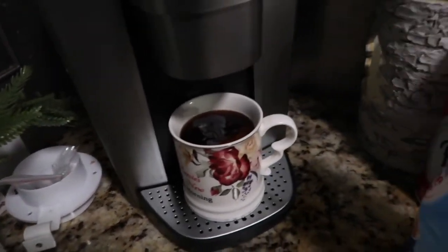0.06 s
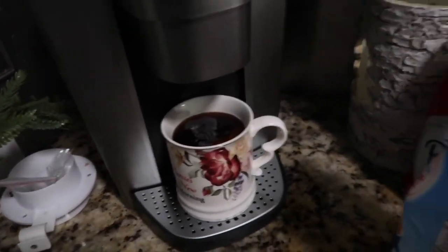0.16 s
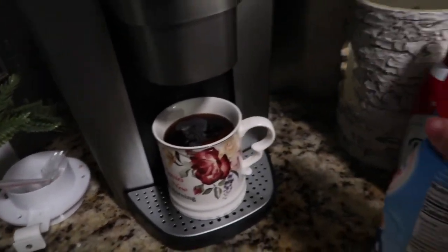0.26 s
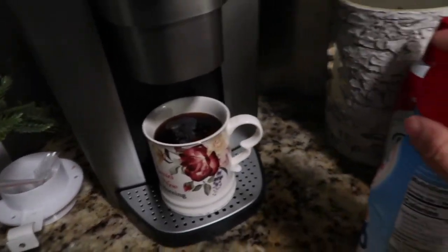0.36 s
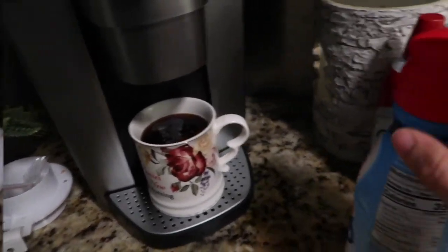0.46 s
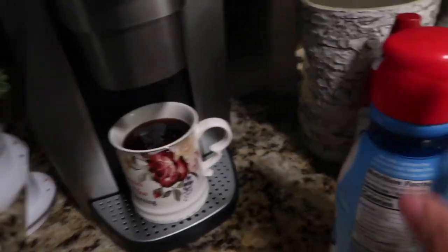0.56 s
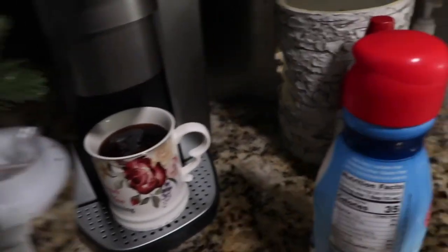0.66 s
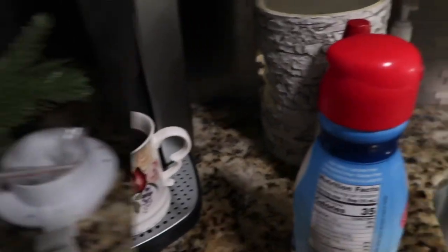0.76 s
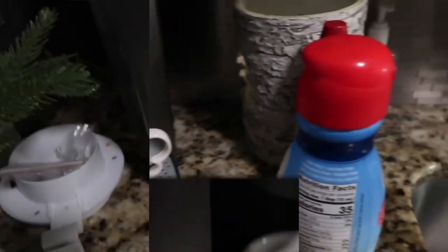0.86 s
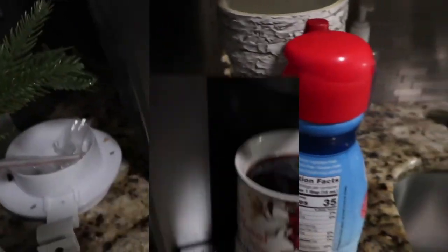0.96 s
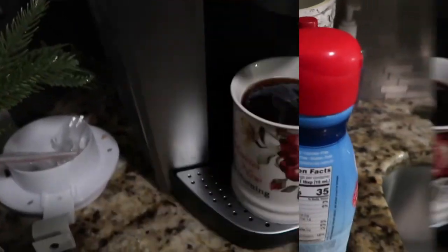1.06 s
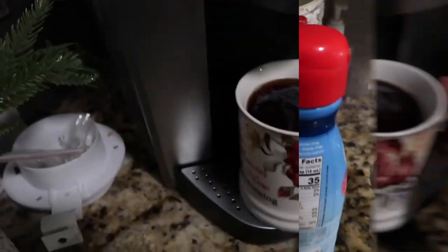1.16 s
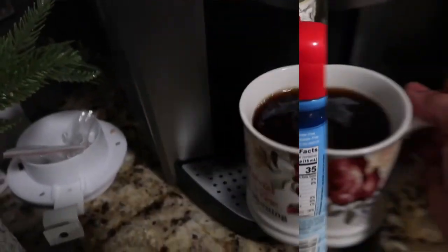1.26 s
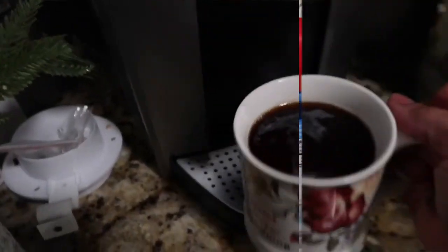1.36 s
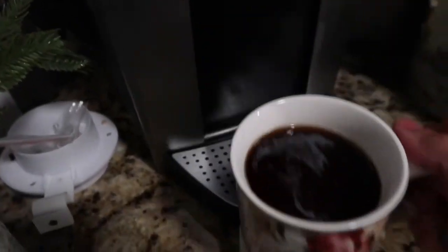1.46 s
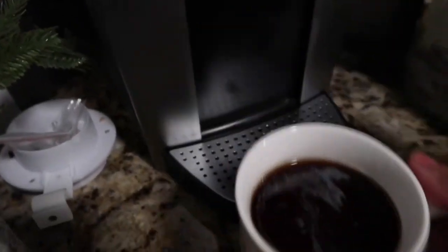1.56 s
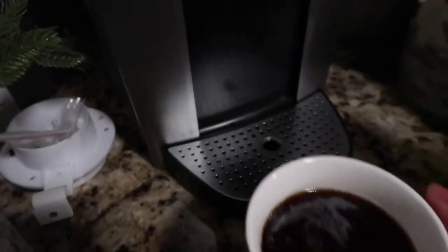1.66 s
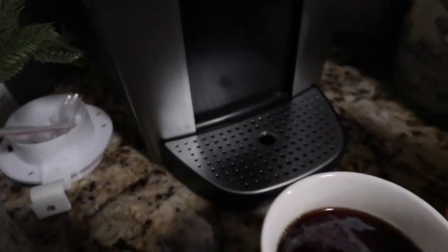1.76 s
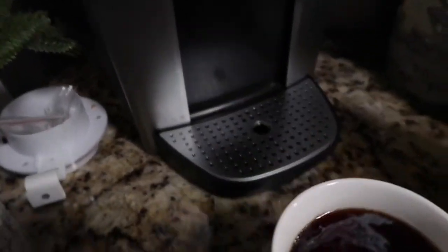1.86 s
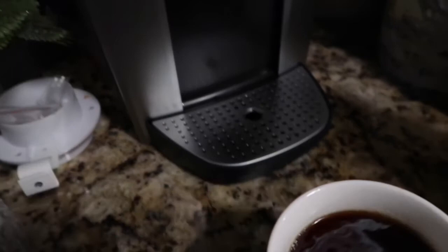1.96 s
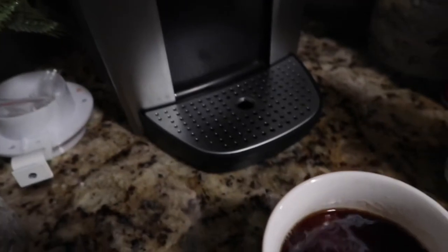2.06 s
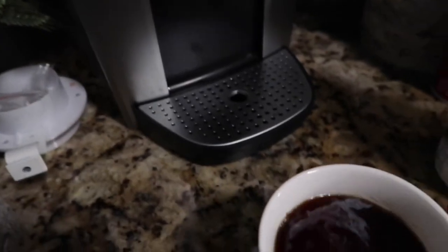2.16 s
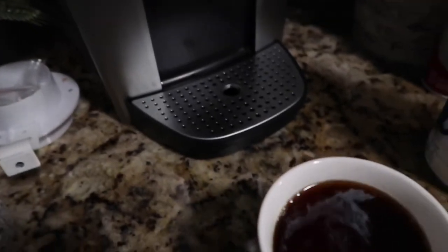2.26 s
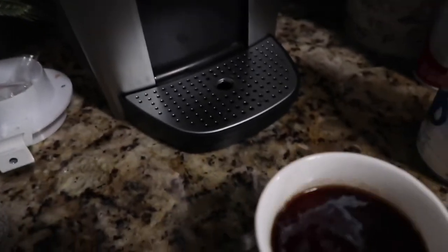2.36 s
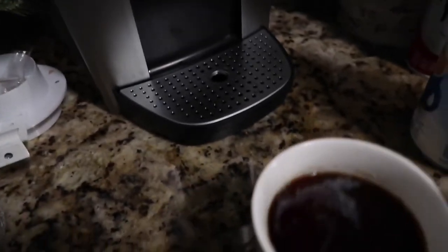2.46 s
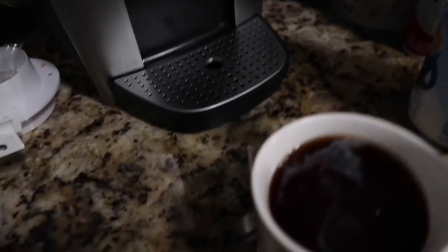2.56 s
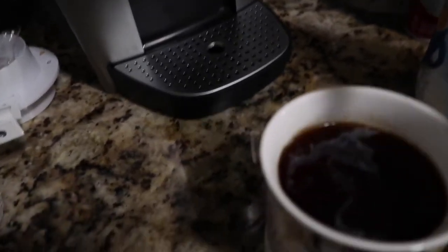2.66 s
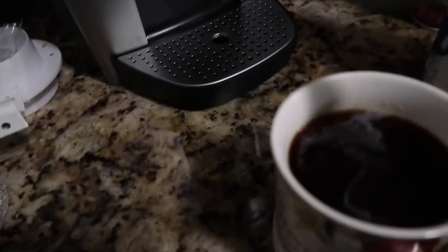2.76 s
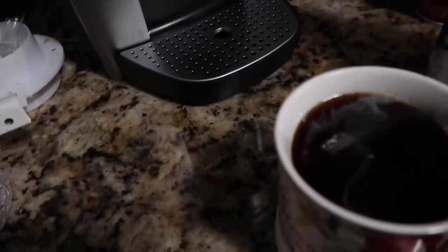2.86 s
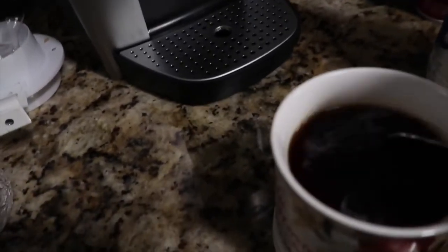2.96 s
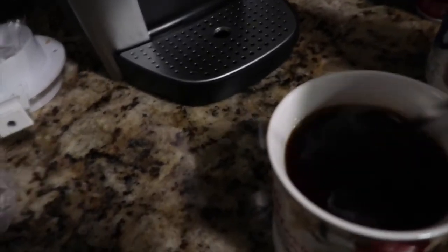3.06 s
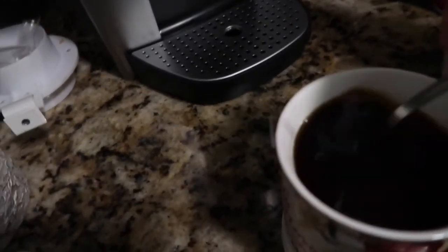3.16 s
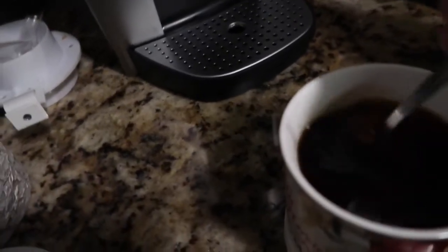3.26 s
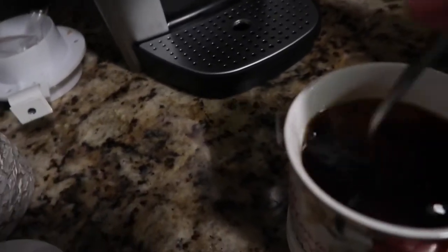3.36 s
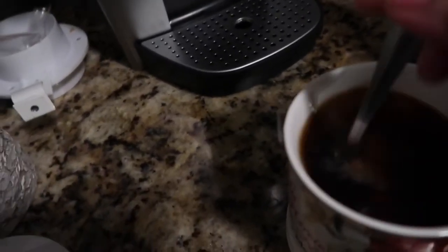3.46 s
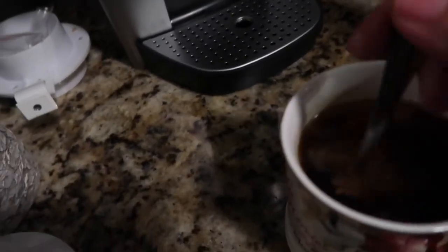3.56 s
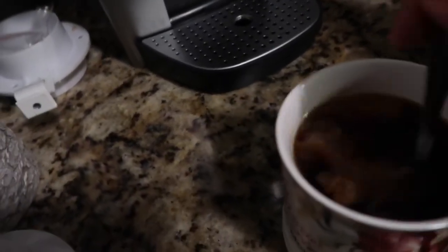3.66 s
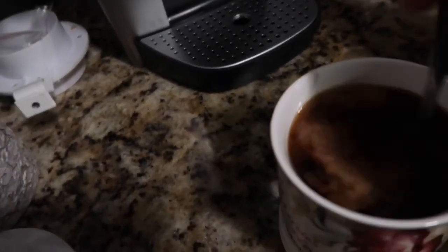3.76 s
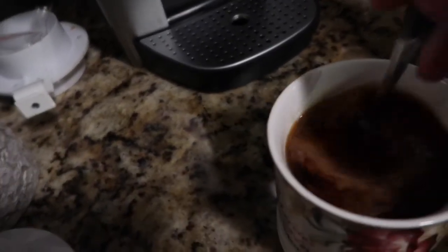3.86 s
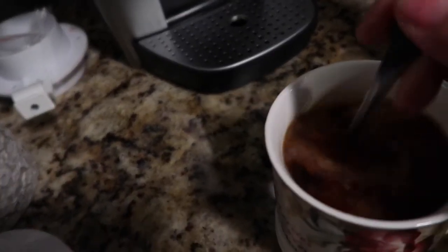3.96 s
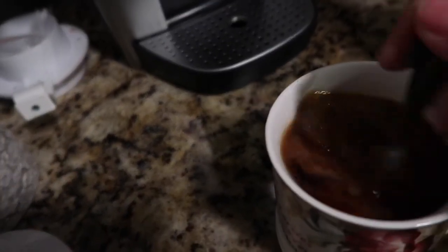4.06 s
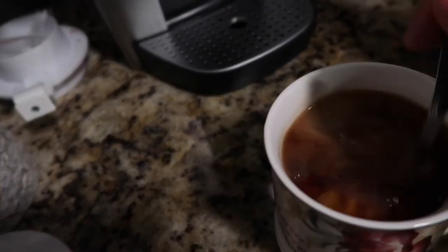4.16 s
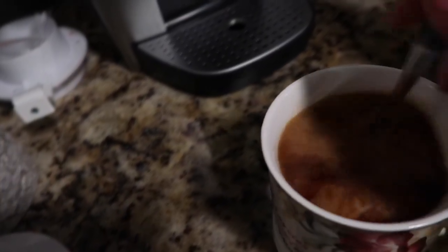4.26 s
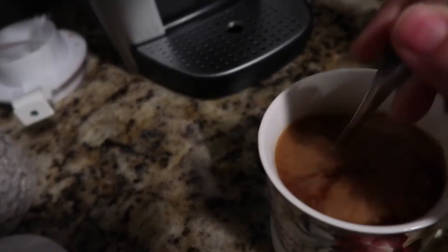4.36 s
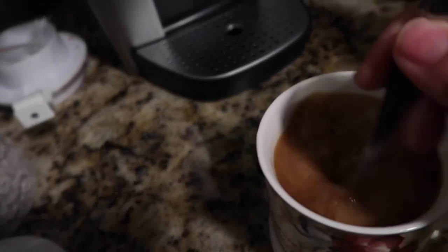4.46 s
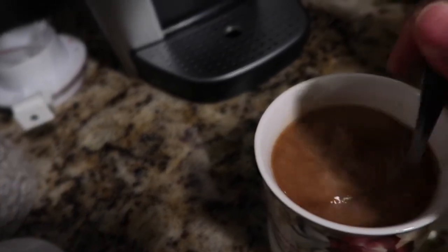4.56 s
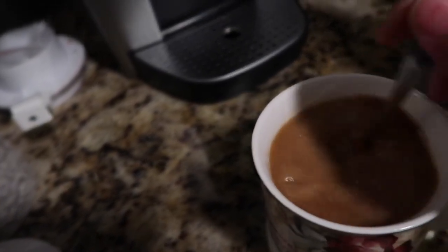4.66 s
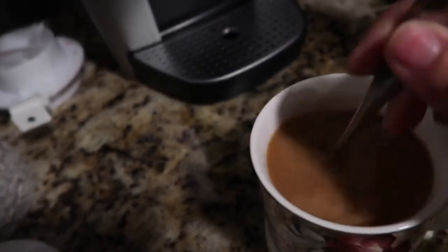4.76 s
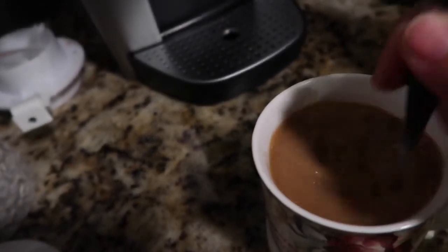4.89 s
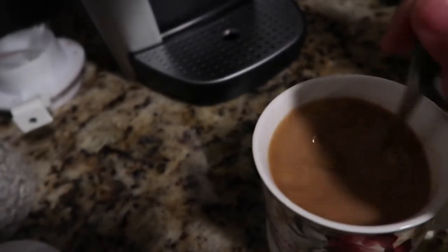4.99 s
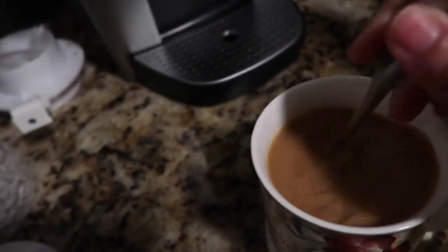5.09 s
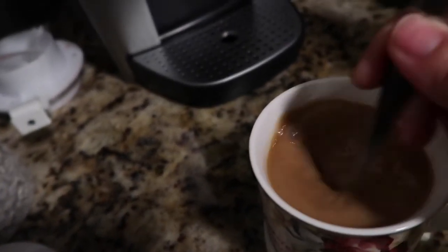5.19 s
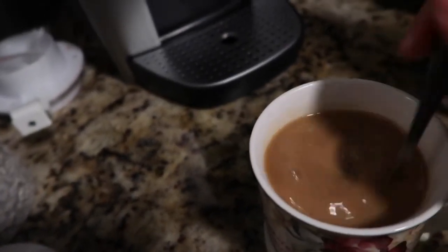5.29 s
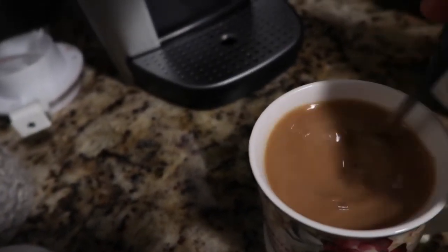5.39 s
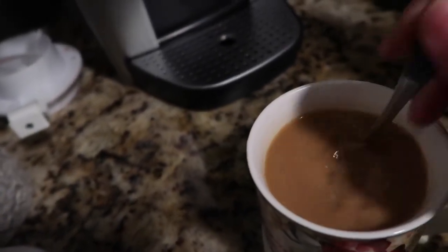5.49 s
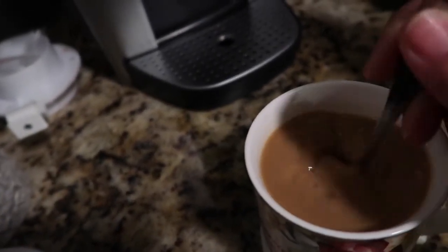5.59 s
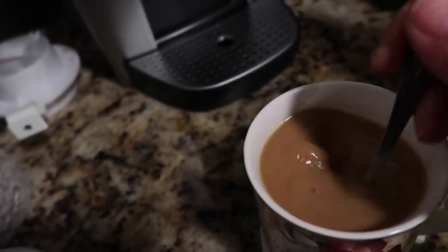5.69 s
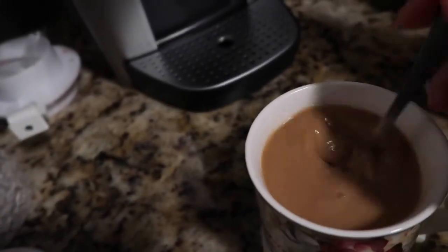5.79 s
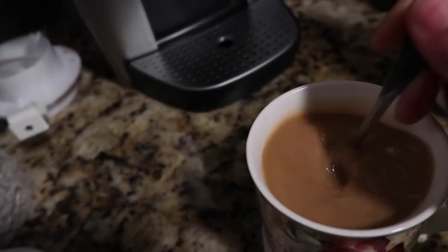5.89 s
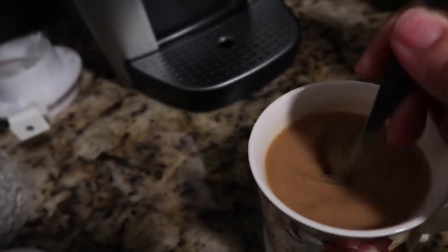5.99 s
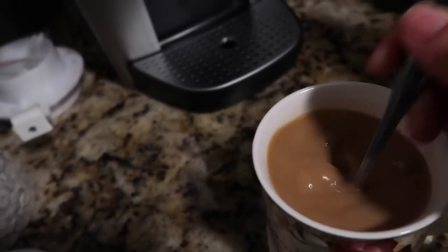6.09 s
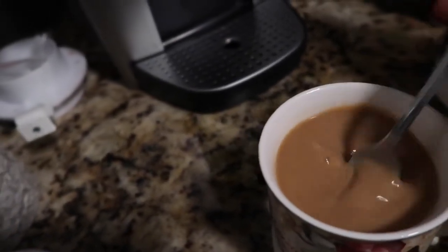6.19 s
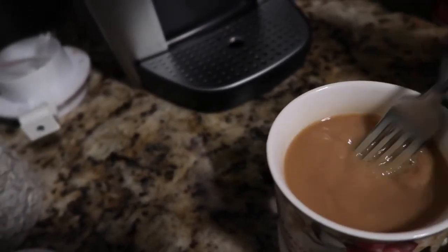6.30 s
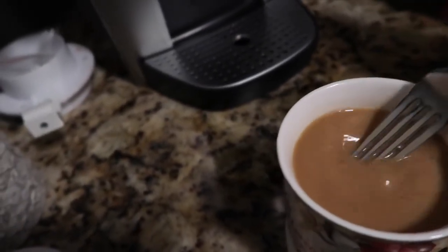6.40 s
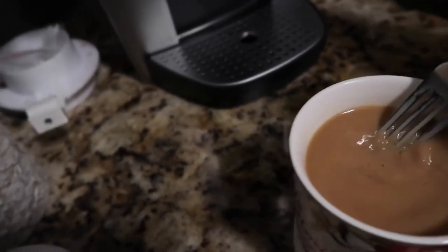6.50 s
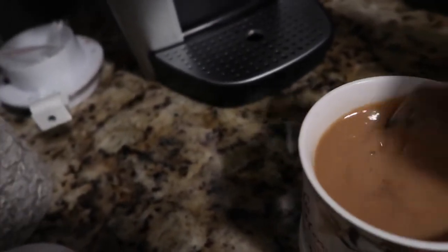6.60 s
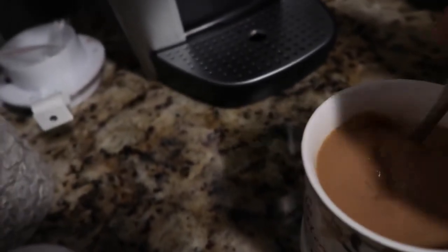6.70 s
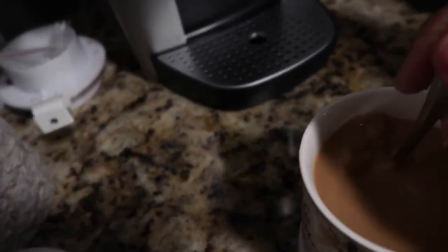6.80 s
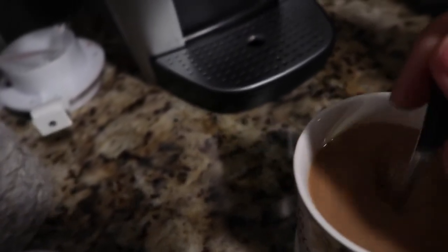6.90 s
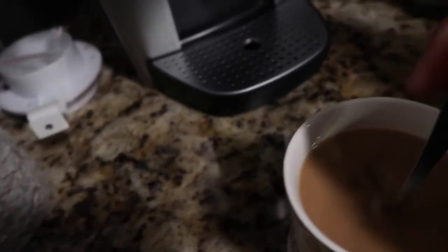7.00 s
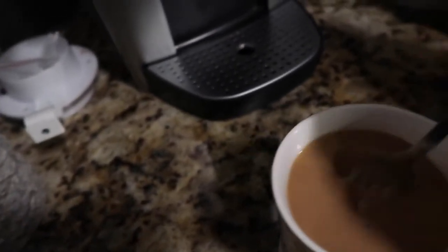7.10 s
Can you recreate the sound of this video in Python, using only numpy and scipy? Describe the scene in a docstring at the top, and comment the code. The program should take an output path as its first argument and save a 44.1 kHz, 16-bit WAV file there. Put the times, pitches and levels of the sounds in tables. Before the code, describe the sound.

Plastic bottle thuds on a stone counter, a china mug scrapes and lands hard, then a fork clinks busily while stirring coffee.

```python
"""A kitchen counter heard from close by, with room air and a mains hum from an appliance throughout.
First a plastic bottle thuds down, then a full china mug is gripped and rasps, squeaks and judders over a tray.
It lands hard on the stone and rocks, ringing; the gain drops at the loud blow and creeps back.
Then a fork stirs the coffee: the mug's bottom knocks, its wall sings, the steel chatters, and the liquid swirls.
Blows are bursts of noise through resonances, rings are fading sine waves, and rubs are noise full of small jerks."""
import sys
import numpy as np
from scipy import signal
from scipy.fft import rfft, irfft, next_fast_len
from scipy.io import wavfile
from scipy.ndimage import uniform_filter1d, map_coordinates

SR = 44100
rng = np.random.default_rng(int(sys.argv[2]) if len(sys.argv) > 2 else 0)


def store_pcm(level_fs):
    """Save levels as 16-bit WAV."""
    pcm = np.round(np.clip(level_fs, -1, 1) * 32767).astype(np.int16)
    wavfile.write(sys.argv[1], SR, np.atleast_2d(pcm).T)


N = 314874
T = np.arange(int(.35 * SR)) / SR  # clock of one short sound, in seconds


def amp(db):
    """Turn decibels into gain."""
    return 10 ** (np.asarray(db) / 20)


def unit(x):
    """Scale to an average (rms) level of 1."""
    return x / np.sqrt(np.mean(x ** 2) + 1e-20)


def struck(x):
    """Scale a blow to rms 1 over its first 30 ms."""
    return x / np.sqrt(np.mean(x[:int(.03 * SR)] ** 2) + 1e-20)


def along(points, hz):
    """Read a curve of (Hz, value) points at any pitch, on a log pitch axis."""
    f, v = np.transpose(points)
    return np.interp(np.log(hz + 1), np.log(f + 1), v)


def filtered(x, response):
    """Multiply the spectrum of x by a response, with spare room so that ringing does not wrap around."""
    n = x.shape[-1]
    m = next_fast_len(n + 8192)
    hz = np.fft.rfftfreq(m, 1 / SR)
    return irfft(rfft(x, m) * response(hz), m)[..., :n]


def coloured(x, spectrum):
    """Shape x with a curve of (Hz, dB) points."""
    return filtered(x, lambda hz: amp(along(spectrum, hz)))


def resonate(x, body):
    """Pass x through broad resonances (Hz, width Hz, dB), added with alternating signs."""
    def response(f):
        total = 0
        for k, (centre, width, db) in enumerate(body):
            peak = 1j * f * width / (centre * centre - f * f + 1j * f * width)
            total = total + (-1) ** k * amp(db) * peak
        return total
    return filtered(x, response)


def add(track, s, x):
    """Mix x into the track at time s, in seconds."""
    i = max(round(s * SR), 0)
    track[i:i + len(x)] += x[:N - i]


def swell(start, full, release, rise_db_per_s, fall_db_per_s):
    """Gain of a movement that begins at start, holds from full to release, and fades."""
    t = np.arange(N) / SR
    rise = -rise_db_per_s * np.maximum(full - t, 0)
    fall = -fall_db_per_s * np.maximum(t - release, 0)
    return (t > start) * amp(rise + fall)


def patchy(x, depth_db):
    """Make patches of the spectrum come and go, as when a contact point wanders."""
    z = signal.stft(x, nperseg=512)[2]
    field = uniform_filter1d(rng.standard_normal(z.shape), 4, axis=0)
    field = uniform_filter1d(field, 7, axis=1)
    return signal.istft(z * amp(depth_db * unit(field)), nperseg=512)[1][:len(x)]


def chatter(t60, snap):
    """One sharp contact, then dense micro-contacts that die away."""
    return rng.standard_normal(len(T)) * (amp(-60 * T / t60) + snap * np.exp(-T / 0.00042))


def ring(modes, t60, attack, scatter_db=0, waver=0):
    """A struck body sings in fading sine waves; each call varies their strength, damping and tuning."""
    out = 0
    for hz, db, life in modes:
        strength, damping, tuning = rng.standard_normal(3)
        drift = waver * np.interp(T, np.linspace(0, T[-1], 24), rng.standard_normal(24))
        mode_t60 = t60 * life * np.exp(.2 * damping)
        fade = amp(db + scatter_db * strength - 60 * T / mode_t60)
        pitch = hz * (1 + (.002 + waver / 2) * tuning + drift)
        cycles = np.cumsum(pitch) / SR + rng.random()
        out = out + fade * np.sin(2 * np.pi * cycles)
    return struck(out * (1 - np.exp(-T / attack)))


def grit(count, spread_db):
    """Rubbing noise made of tiny slips of uneven size."""
    return rng.standard_normal(count) * amp(spread_db * np.minimum(rng.exponential(size=count), 4))


SLIPS_PER_S = 900  # middle rate of the jerks, which wanders up and down


def slips(count):
    """A contact sticks and lets go: sharp jerks of uneven size and spacing over a finer rasp."""
    wander = np.repeat(rng.standard_normal(count // 100 + 1), 100)[:count]
    phase = np.cumsum(SLIPS_PER_S / SR * np.exp(.7 * wander))
    jerks = np.diff(np.floor(phase), prepend=0) * rng.standard_normal(count)
    return unit(jerks) + .8 * unit(grit(count=count, spread_db=3))


# Colour of the room air. Each row: pitch in Hz, relative level in dB.
AIR_COLOUR = [(25, -26.5), (80, -8), (120, -8.5), (160, -16), (350, -10), (450, -15), (1150, -19.5),
              (2500, -25.5), (6000, -32), (9000, -38.5), (11500, -37), (13000, -46), (15000, -78.5)]
# How alike left and right are in the air. Each row: pitch in Hz, likeness from 1 (same) to -1 (opposite).
AIR_LIKENESS = [(60, .93), (130, .85), (300, 0), (1400, .1), (8000, -.1), (14000, -.6)]
# Mains hum of the appliance. Each row: pitch in Hz, level in dB around which it wavers.
HUM_TONES = [(119.6, -55), (239.5, -68.5), (359, -66)]


def background():
    """Room air is coloured noise spread over left and right; the hum is a few slowly wavering tones."""
    def spread(hz):
        turn = np.arccos(np.clip(along(AIR_LIKENESS, hz), -1, 1)) / 2
        return np.array([np.cos(turn), np.sin(turn)])
    mid, side = filtered(coloured(rng.standard_normal((2, N)), AIR_COLOUR), spread)
    air = amp(-51.5) * unit(np.array([mid + side, mid - side]))
    t = np.arange(N) / SR
    waver = map_coordinates(rng.standard_normal(64), [t * 4])  # about four changes a second
    hum = 0
    for hz, db in HUM_TONES:
        hum = hum + amp(db) * np.sqrt(2) * np.sin(2 * np.pi * (hz * t + rng.random()))
    return air + hum * amp(.5 * waver)


# How long the room rings. Each row: pitch in Hz, time in seconds to fall by 60 dB.
ROOM_FADE = [(100, 1), (500, 0.55), (2000, 0.64), (5000, .6), (9000, 0.15), (11500, 0.16), (14000, 0.35)]


def kitchen(x, near_db, tail_db, apart_db):
    """Cabinets and counter answer at once, a left-right difference is added, and a diffuse tail follows."""
    hz, t, z = signal.stft(rng.standard_normal((3, SR)), SR, nperseg=256)
    fading = z * amp(-60 * t / along(ROOM_FADE, hz)[:, None])
    common, *own = signal.istft(fading, SR, nperseg=256)[1]
    t = np.arange(len(common)) / SR
    # the two sides share the bass and differ more towards the treble
    own = coloured(np.array(own), [(100, -30.0), (300, -17.0), (1500, -11.5), (6000, 6.0)])
    tail = (common + own) * (1 - np.exp(-t / 0.0018))
    # the tail is dark, with little above 11 kHz
    tail = coloured(tail, [(80, -2.0), (300, 10.0), (10500, -2.5), (12000, -23.5), (14000, -19.5)])
    near = rng.standard_normal(len(t)) * amp(-60 * t / 0.19) * (t > .003)
    # the early reflections are thin in the bass
    near = coloured(near, [(150, -18.0), (800, 3.5), (11000, 2.0), (14000, 1.5)])
    apart = rng.standard_normal(len(t)) * amp(-60 * t / 0.017)
    apart = coloured(apart, [(200, -16.0), (1200, -9.5), (4000, 8.0), (9000, 16.0), (13000, -5)])
    answer = amp(near_db) * near / np.linalg.norm(near)
    answer = answer + amp(tail_db) * tail / np.linalg.norm(tail[0])
    answer = answer + amp(apart_db) * np.array([apart, -apart]) / np.linalg.norm(apart)
    return signal.fftconvolve(x[None], answer, axes=1)[:, :N]


# Light taps on plastic and ticks of the fork. Each row: start in seconds, level in dB, centre pitch in Hz.
TAP_EVENTS = [(.302, -45.5, 5820), (1.898, -43, 2744), (4.103, -37.5, 10520), (4.24, -37.5, 8480)]


def taps():
    """Plastic and steel tick lightly: a short crackle through one broad resonance."""
    out = np.zeros(N)
    for s, db, hz in TAP_EVENTS:
        tick = resonate(chatter(t60=0.066, snap=2.8), [(hz, hz * 0.35, 0)])
        add(out, s, amp(db) * struck(tick))
    return out


# The bottle meets the counter. Each row: start in seconds, thud level in dB, shell level in dB.
BOTTLE_EVENTS = [(0.014, -38.5, -68), (0.552, -21, -30.5), (0.606, -25, -68), (1.9, -42.5, -49.5),
                 (3.562, -37, -35)]
# Colour of the bottle's shell. Each row: pitch in Hz, relative level in dB.
SHELL_COLOUR = [(60, 6.5), (400, -5), (1300, -20.5), (2500, -33), (8000, -39.5)]


def bottle():
    """The bottle rocks on its base: two low modes make the thud and dull noise the shell."""
    out = np.zeros(N)
    for s, thud_db, shell_db in BOTTLE_EVENTS:
        thud = ring([(103.1, 3.5, 0.72), (141.0, -4.5, 0.7)], t60=0.16, attack=0.22)
        shell = struck(coloured(chatter(t60=0.18, snap=0.4), SHELL_COLOUR))
        add(out, s, amp(thud_db) * thud)
        add(out, s, amp(shell_db) * shell)
    return out


GRIP_S, GRIP_DB = .835, -28.5  # start in seconds, level of the ring
# Tones of the gripped mug. Each row: pitch in Hz, relative level in dB, relative life.
GRIP_TONES = [(1940, -6, 3.6), (2017, 0, 2.9), (4140, 3, 0.72), (5610, 19, 0.42), (7795, 5, 0.48),
              (10240, 6.5, 0.76)]


def grip():
    """The mug ticks lightly as the hand takes hold of it, and the china rings freely."""
    out = np.zeros(N)
    tick = struck(resonate(chatter(t60=0.11, snap=0.94), [(4100, 1300, 5.5), (10550, 1900, -4.5)]))
    tone = ring(GRIP_TONES, t60=0.138, attack=0.00032)
    add(out, GRIP_S, amp(GRIP_DB) * (tone + amp(-9) * tick))
    return out


# the mug begins to move, slides at full level, and the steady rasp begins to fade (seconds)
SLIDE_FROM_S, SLIDE_FULL_S, SLIDE_FADE_S = 0.64, 1.253, 1.36
SLIDE_DB, SLIDE_RISE_DB_PER_S, SLIDE_FALL_DB_PER_S = -40, 57.5, 160
GRIT_PER_S, GRIT_DB = 260, -3  # grains of the foot that snap over the tray; level over the slide's
# Colour of the rasp. Each row: pitch in Hz, relative level in dB.
SCRAPE_COLOUR = [(180, -65), (500, -20), (986, 6), (1680, 4.5), (2900, -3), (3510, -3.5), (11000, -4),
                 (12900, -12), (14000, -87)]


def slide():
    """The mug's unglazed foot rasps over the tray by sticking and slipping, and its grains snap."""
    pull = swell(SLIDE_FROM_S, SLIDE_FULL_S, SLIDE_FADE_S, SLIDE_RISE_DB_PER_S, SLIDE_FALL_DB_PER_S)
    rasp = coloured(patchy(slips(count=N), depth_db=3.5), SCRAPE_COLOUR)
    body = resonate(rasp, [(1200, 60, -6.5), (1940, 42, 5), (2650, 62, 4),
                           (3590, 90, -4), (5000, 90, -4.5), (5910, 90, -1)])
    out = amp(SLIDE_DB) * pull * unit(unit(rasp) + .5 * unit(body))
    snaps = (rng.random(N) < GRIT_PER_S / SR) * rng.standard_normal(N)
    snaps = resonate(snaps, [(1901, 450, 6.0), (3514, 2000, 2), (5170, 800, -11.5), (9710, 2900, -15.0)])
    return out + amp(SLIDE_DB + GRIT_DB) * pull * unit(snaps)


SQUEAK_S, SQUEAK_DB, SQUEAK_HZ, SQUEAK_LENGTH_S = 1.1, -37.5, 3520, 0.1


def squeak():
    """The foot squeaks once as it gathers speed: its slips excite a few narrow resonances."""
    out = np.zeros(N)
    tone = unit(resonate(slips(count=len(T)), [(SQUEAK_HZ, 110, 0), (2630, 70, -4), (2190, 70, -5)]))
    stroke = np.sin(np.pi * np.minimum(T / SQUEAK_LENGTH_S, 1))
    add(out, SQUEAK_S, amp(SQUEAK_DB) * stroke * tone)
    return out


# The mug's foot catches on the tray. Each row: start in seconds, judder level in dB, centre pitch in Hz,
# time held before fading in seconds, level of the tray's ring in dB.
CATCH_EVENTS = [(0.982, -46, 3460, 0.028, -66), (1.24, -39, 1740, 0.021, -42.5),
                (1.292, -32.5, 1270, 0.018, -44), (1.335, -39.5, 2800, 0.019, -43.5),
                (1.362, -33, 1433, 0.024, -40.5), (1.419, -33.5, 1357, 0.014, -45.5),
                (1.489, -34.5, 1610, 0.014, -42.5), (1.574, -27.5, 1632, 0.006, -43),
                (1.583, -33, 1540, 0.0055, -32.5)]


def catches():
    """The foot judders where it catches: a short burst of slips, after which the tray rings on."""
    out = np.zeros(N)
    for s, db, hz, length, ring_db in CATCH_EVENTS:
        stroke = (1 - np.exp(-T / 0.0025)) * np.exp(-np.maximum(T - length, 0) / 0.0064)
        body = [(650, 300, -17), (930, 160, -10), (hz, 220, 0), (2650, 500, -13), (5500, 3000, -18)]
        judder = resonate(stroke * slips(count=len(T)), body)
        judder = coloured(judder, [(7000, 9.0), (10000, -16.0), (14000, -27.0)])
        add(out, s, amp(db) * struck(judder))
        tray_modes = [(hz, 0, .3), (hz + 70, -2, .3), (hz + 75, -19, 1.6)]
        add(out, s, amp(ring_db) * ring(tray_modes, t60=0.22, attack=0.002))
    return out


# The mug lands and rocks. Each row: start in seconds, knock level in dB, rim ring in dB, foot ring in dB,
# crack in dB, free ringing in seconds.
LANDING_EVENTS = [(2.0599, -6.5, -2, -7.5, -25, 0.056), (2.1411, -11.5, -17, -21.5, -52.5, 0.02),
                  (2.178, -16.5, -18.5, -32, -59, 0.033), (2.2938, -11.5, -8.5, -24.5, -25, 0.033)]
# Resonances of the stone under the mug. Each row: pitch in Hz, width in Hz, relative level in dB.
STONE_BODY = [(105, 60, -3), (200, 100, -5), (346, 40, 0), (455, 70, -6), (620, 140, -8), (778, 45, 0),
              (958, 40, 2), (1225, 70, -1), (1550, 200, -1), (1850, 120, -1), (2350, 120, -5),
              (2750, 200, -10), (3670, 300, -13)]
# Colour of the hard crack. Each row: pitch in Hz, relative level in dB.
CRACK_COLOUR = [(300, -31.5), (1500, -1), (3000, 17.5), (4500, 7), (6500, -0.5), (8000, -10), (10000, -33),
                (16000, -50)]


def landings():
    """The full mug hits the stone, rocks twice and settles: each time a knock, a dead thump and a crack."""
    out = np.zeros(N)
    for s, knock_db, _, _, crack_db, _ in LANDING_EVENTS:
        knock = resonate(chatter(t60=0.13, snap=2.1), STONE_BODY)
        knock = coloured(knock, [(3900, 0.5), (4700, -7), (7800, -9.5), (9000, -22), (15000, -22.5)])
        slab = [(150, -10.5), (500, 12.5), (1700, 7.5), (5000, -41.5), (10000, -60)]
        thump = coloured(chatter(t60=0.086, snap=1.6), slab)
        crack = coloured(chatter(t60=0.11, snap=2.3), CRACK_COLOUR)
        add(out, s, amp(knock_db) * struck(knock))
        add(out, s, amp(knock_db - 4.5) * struck(thump))
        add(out, s, amp(crack_db) * struck(crack))
    return out


LANDED_T60_S, LANDED_CHOKE_DB_PER_S, LANDED_CHOKE_DB = 0.23, 892, 27  # free fade; choke's speed and depth
# Tones of the rim, then of the foot. Each row: pitch in Hz, relative level in dB, relative life.
LANDED_RIM_TONES = [(1912, -4, .2), (2021, 0, 1.25)]
FOOT_TONES = [(1632, -6, .7), (3668, 0, 1), (3730, -6, .7), (3850, -12, .8)]


def landing_rings():
    """While the mug stands on one edge its wall rings freely; the foot comes down flat and chokes it."""
    out = np.zeros(N)
    for s, _, rim_db, foot_db, _, free_s in LANDING_EVENTS:
        choke = amp(-np.clip(LANDED_CHOKE_DB_PER_S * (T - free_s), 0, LANDED_CHOKE_DB))
        add(out, s, amp(rim_db) * choke * ring(LANDED_RIM_TONES, LANDED_T60_S, attack=0.0019))
        add(out, s, amp(foot_db) * choke * ring(FOOT_TONES, t60=0.06, attack=0.00061))
    return out


SWIRL_FROM_S, SWIRL_CALM_S = 3.1, 4.9
SWIRL_DB, SWIRL_FALL_DB_PER_S = -51.5, 20


def swirl():
    """The coffee swirls as patchy soft noise, then calms."""
    flow = swell(SWIRL_FROM_S, SWIRL_FROM_S, SWIRL_CALM_S, 0, SWIRL_FALL_DB_PER_S)
    eddies = patchy(rng.standard_normal(N), depth_db=4.5)
    wash = coloured(eddies, [(80, 6.5), (350, 7.5), (900, -4.5), (2500, -5.0),
                             (6000, -7.5), (11000, -18.5), (14000, -18.5)])
    return amp(SWIRL_DB) * flow * unit(wash)


# Bubbles in the coffee. Each row: start in seconds, level in dB, starting pitch in Hz.
BUBBLE_EVENTS = [(4.14, -43.5, 1426), (4.399, -35, 2390), (4.56, -45, 2630), (5.773, -49.5, 1587),
                 (5.785, -50.5, 3620), (5.807, -52, 2640)]


def bubbles():
    """Air folded into the coffee rings and rises in pitch, with a snap as the surface shuts."""
    out = np.zeros(N)
    for s, db, hz in BUBBLE_EVENTS:
        pitch = hz * (1 + 0.27 * (1 - np.exp(-T / 0.052)))
        fade = amp(-60 * T / 0.085) * (1 - np.exp(-T / 0.00023))
        tone = np.sin(2 * np.pi * np.cumsum(pitch) / SR) * fade
        snap = resonate(chatter(t60=0.035, snap=2.3), [(hz, 1500, 0)])
        add(out, s, amp(db) * struck(tone))
        add(out, s, amp(db - 5.0) * struck(snap))
    return out


# The tines rub along the china. Each row: start in seconds, level in dB, length in seconds,
# squeal pitch in Hz, squeal level in dB over the rub.
RUB_EVENTS = [(3.166, -41, 0.11, 11100, -5), (3.57, -32, 0.026, 10680, 2.5),
              (4.602, -35.5, 0.055, 6320, -4.5), (4.855, -44.5, 0.096, 5430, -4),
              (4.975, -46, 0.068, 6200, -1), (5.201, -39, 0.12, 5636, -6), (6.123, -37, 0.055, 5125, 4.5),
              (6.252, -51.5, .058, 5526, 4), (6.892, -46, .065, 8050, 1.5)]


def rubs():
    """The tines stick and slip along the china: a scrape through several resonances and one narrow squeal."""
    out = np.zeros(N)
    body = [(3780, 260, -7.5), (5210, 400, -9), (7000, 290, -7.5),
            (8040, 67, -5), (9460, 210, -5.0), (11230, 260, -3.5)]
    for s, db, length, squeal_hz, squeal_db in RUB_EVENTS:
        stroke = np.sin(np.pi * np.minimum(T / length, 1))
        rub = patchy(slips(count=len(T)), depth_db=4)
        squeal = unit(resonate(rub, [(squeal_hz, 45, 0)]))
        add(out, s, amp(db + squeal_db) * stroke * squeal)
        add(out, s, amp(db) * stroke * unit(resonate(rub, body)))
    return out


SLOSH_DB, SLOSH_RISE_S, SLOSH_T60_S = -5, 0.016, 0.099  # level over the bottom knock, rise and fade
# Resonances of the shoved coffee. Each row: pitch in Hz, width in Hz, relative level in dB.
SLOSH_BODY = [(420, 290, -6), (766, 74, 3), (1060, 210, -2)]


def sloshes():
    """The fork shoves coffee aside: a short surge of noise, louder where the bottom knocks harder."""
    out = np.zeros(N)
    surge = (1 - np.exp(-T / SLOSH_RISE_S)) * amp(-60 * T / SLOSH_T60_S)
    for s, knock_db, *_ in FORK_BLOWS:
        lapping = surge * patchy(grit(count=len(T), spread_db=3), depth_db=3)
        add(out, s, amp(knock_db + SLOSH_DB) * struck(resonate(lapping, SLOSH_BODY)))
    return out


FLUTTER_DB = 3  # typical swing of the gain


def flutter():
    """A gain that trembles quickly and at random."""
    return amp(FLUTTER_DB * np.interp(T, np.linspace(0, T[-1], 30), rng.standard_normal(30)))


# The fork meets the china. Each row: start in seconds, then base levels in dB of the bottom knock, the rim,
# the wall's low pair, its lower and upper high tone, the fork's shank, tines, tips and topmost tones,
# and last the china's basic ring time in seconds (to fall by 60 dB).
FORK_BLOWS = [(3.02, -37, -50, -58, -52.5, -55.5, -24, -27, -29.5, -43, 0.19),
              (3.028, -32.0, -19, -23, -23.5, -18, -27, -20, -17.5, -34, 0.12),
              (3.489, -50, -73, -41.5, -70, -70, -36, -22.5, -23, -29.5, 0.31),
              (3.555, -52, -51, -54, -70, -55, -38, -25, -30.5, -24, 0.083),
              (3.574, -40.5, -54, -57.5, -64.0, -60.0, -37.5, -31.0, -20.5, -40.5, 0.11),
              (3.715, -52.5, -51, -60.5, -55, -64.5, -38.5, -30, -22, -31, 0.11),
              (3.816, -57, -30, -39, -30, -29, -32, -24.5, -33, -36.5, 0.066),
              (3.92, -50.5, -28.5, -35, -35.5, -33, -26, -21.5, -37.5, -35.5, 0.049),
              (4.016, -38.5, -70.0, -66.5, -47, -43, -43.5, -41, -43, -57, 0.036),
              (4.16, -57, -52, -68.0, -70.0, -70, -37.0, -30.5, -29, -31.5, 0.03),
              (4.279, -52.5, -37, -56, -45, -45.5, -48.5, -41.5, -48.5, -65, 0.1),
              (4.354, -48.5, -37, -41, -41.5, -55, -38.5, -29, -41, -47, 0.076),
              (4.394, -36.5, -48, -50.0, -42, -57.5, -51.5, -48, -53, -53.5, 0.074),
              (4.442, -40.5, -54, -46, -38, -54, -41.5, -42.5, -40.5, -37.5, 0.1),
              (4.595, -43, -64, -60, -49, -44, -33.5, -34.5, -26, -35.5, 0.049),
              (4.662, -49, -28.5, -34, -39, -29, -34, -28, -30, -56, 0.097),
              (4.768, -44, -33.5, -41, -29, -41.5, -29.5, -24.5, -33, -39.5, 0.07),
              (4.787, -33, -31.5, -35, -36.5, -47, -42.5, -41, -32.5, -55, 0.17),
              (4.965, -41, -49.5, -66, -38, -51, -36.5, -33, -28.5, -39.5, 0.13),
              (5.058, -50.5, -37, -39.5, -31, -39, -40, -43, -45, -67, 0.058),
              (5.141, -46.5, -33, -45, -43, -43.5, -31.5, -28.5, -33.5, -43.5, 0.072),
              (5.172, -31.5, -42.5, -48.5, -38.5, -56, -40, -36, -37, -55.5, 0.26),
              (5.248, -39.5, -51, -64, -60, -61, -48.5, -41.5, -31, -39.5, 0.1),
              (5.317, -54.5, -62, -73, -70, -65, -47, -38, -32.5, -38.5, 0.072),
              (5.585, -28.5, -41, -51.0, -51, -55, -35.5, -27, -29.0, -39, 0.095),
              (5.984, -32.5, -51, -67.5, -54, -52, -30.5, -29, -28, -36.5, 0.18),
              (6.123, -51, -71, -43, -47, -64.5, -36.5, -29, -30.5, -35.5, 0.07),
              (6.142, -43.5, -50, -47, -48, -61.5, -37, -33.5, -29, -35, 0.085),
              (6.198, -62.5, -57.5, -76, -59.0, -70, -45.0, -62.5, -38.5, -50.5, 0.094),
              (6.483, -57.5, -44.0, -65, -38, -73, -43.0, -41.0, -55, -55.5, 0.064),
              (6.578, -42.5, -26.5, -36, -23, -64, -32.5, -28.5, -41.5, -37, 0.035),
              (6.717, -51, -41, -60, -40.0, -67, -47, -42, -52.5, -72, 0.096),
              (6.797, -25, -31.5, -41, -38, -39, -25, -23, -18, -36.5, 0.21),
              (6.903, -39, -45.5, -52, -46, -56.0, -52.5, -44, -55, -65, 0.17)]
# Tones of the mug's rim and of its high chime. Each row: pitch in Hz, relative level in dB, relative life.
RIM_TONES = [(1932, 0, 1.1), (2020, -2, 1.3)]
CHIME_TONES = [(7227, 0, .9), (7785, -7, 1.2), (9090, -6, 1.1), (10200, -6, 1)]
# The wall's tones. Each row: pitches in Hz that sound together (low pair, lower high, upper high).
WALL_TONES = ((4140, 4795), (5545,), (5688,))
# Resonances of the mug's bottom, then of the fork's shank, tines, tips and topmost treble.
# Each row: pitch in Hz, width in Hz, relative level in dB.
BOTTOM_BODY = [(125, 45, -9), (200, 50, -10), (265, 40, -9), (350, 26, 0), (456, 26, -1), (640, 50, -2),
               (779, 30, 3.5), (952, 32, 4.5), (1207, 50, -1), (1300, 60, -5), (1550, 200, -11)]
SHANK_BODY = [(2400, 1800, -0.5), (3400, 600, 4), (3610, 180, 10.5), (4150, 230, -16.5)]
TINE_BODY = [(5070, 110, 4.5), (6640, 400, 8.5), (7200, 410, -2.5), (7300, 260, -7.5), (8530, 200, 2)]
TIP_BODY = [(9100, 56, -1.7), (10710, 500, 2.2)]
TOP_BODY = [(13000, 730, -0.5), (15000, 700, -19)]
# The same fork parts ringing. Each row: pitch in Hz, relative level in dB, relative life.
SHANK_TONES = [(2460, 0, 1), (2550, -5, 1), (3040, -8, .8), (3550, -1, 1), (3670, -1, .9), (3950, -9, 1.2)]
TINE_TONES = [(5114, -3, 1), (6140, -5, .8), (6280, -4, .8), (6560, 0, .8), (6680, 0, .9), (6790, -2, .8),
              (7225, -2, 1.1), (8050, -7, 1.2)]
TIP_TONES = [(8800, -3, 1), (9020, -1, 1), (9650, -7, .7), (10400, -3, .9), (10680, 0, 1.1),
             (10790, -1, 1.1)]
TOP_TONES = [(12100, -6, .8), (12700, -5, .8), (13160, 0, .9), (13280, 0, .9)]
RIM_DB, RIM_AFTER_DB, CHIME_DB = 3.5, -14, -6  # rim and its after-ring over the rim level; chime over the wall
AFTER_RING_DB, AFTER_T60_S = -24, .33  # once the fork has bounced clear, the wall sings on faintly
BUZZ_DB, STEEL_RING_DB = -1.5, -8.5  # the steel's chatter and its own ring, over the part's level
TOUCH_DB, TOUCH_S = 14, .012  # the fork's next touch damps the ring by this much, over this time
WAVER = .009  # typical share by which the rim's pitch wavers; half of it elsewhere


def china_ring(rim_db, wall_dbs, t60):
    """The spot that is struck picks the wall's modes; they linger, beat and flutter."""
    china = amp(rim_db + RIM_DB) * ring(RIM_TONES, t60, attack=0.008, scatter_db=6, waver=WAVER)
    chime = ring(CHIME_TONES, t60, attack=0.005, scatter_db=6, waver=WAVER / 2)
    china += amp(max(wall_dbs) + CHIME_DB) * chime
    after = amp(rim_db + RIM_AFTER_DB) * ring(RIM_TONES, AFTER_T60_S, attack=0.0058, waver=WAVER)
    for pitches, db in zip(WALL_TONES, wall_dbs):
        wall = [(hz, 0, .8) for hz in pitches]
        china += amp(db) * ring(wall, t60, attack=0.02, waver=WAVER / 2)
        after += amp(db + AFTER_RING_DB) * ring(wall, AFTER_T60_S, attack=0.015, waver=WAVER / 2)
    return (china + after) * flutter()


def fork_part(body, tones):
    """One part of the fork chatters against the china and rings briefly."""
    buzz = struck(resonate(patchy(chatter(t60=0.049, snap=0.21), depth_db=5.0), body))
    steel = ring(tones, t60=0.06, attack=0.0018, scatter_db=5)
    return amp(BUZZ_DB) * buzz + amp(STEEL_RING_DB) * steel


def clinks():
    """Each blow has its own mix: the bottom knocks, the wall sings, and the steel chatters and rings."""
    out = np.zeros(N)
    next_touches = [row[0] for row in FORK_BLOWS[1:]] + [N / SR]
    for row, next_s in zip(FORK_BLOWS, next_touches):
        s, knock_db, rim_db, *wall_dbs, shank_db, tine_db, tip_db, top_db, t60 = row
        damped = amp(-TOUCH_DB * np.clip((s + T - next_s) / TOUCH_S, 0, 1))
        add(out, s, china_ring(rim_db, wall_dbs, t60) * damped)
        knock = struck(resonate(chatter(t60=0.13, snap=6.0), BOTTOM_BODY))
        add(out, s, amp(knock_db) * knock)
        add(out, s, amp(shank_db) * fork_part(SHANK_BODY, SHANK_TONES))
        add(out, s, amp(tine_db) * fork_part(TINE_BODY, TINE_TONES))
        add(out, s, amp(tip_db) * fork_part(TIP_BODY, TIP_TONES))
        add(out, s, amp(top_db) * fork_part(TOP_BODY, TOP_TONES))
    return out


# How far left leads right. Each row: pitch in Hz, lead in radians (negative: left lags).
LEFT_LEAD = [(300, 0), (2000, -.2), (5500, -.7), (7500, -.9), (8800, -1.3), (10000, -1.9), (11500, -2.7),
             (15000, -2.9)]


def scene():
    """All sounds are close and central; their treble reaches left and right out of step."""
    close = taps() + bottle() + grip() + slide() + squeak() + catches() + landings()
    close = close + swirl() + bubbles() + rubs() + sloshes() + clinks()
    close = coloured(close, [(20, -15.5), (70, -0.5)])  # the close sounds with their deep bass turned down
    rings = landing_rings()
    # the landing rings are sent more weakly into the room
    echo = kitchen(close + amp(-5.5) * rings, near_db=-9.5, tail_db=-16.0, apart_db=-13.5)
    heard = close + rings + echo
    # patches of the spectrum lean to one side or the other
    sway = coloured(patchy(close, depth_db=0.61) - close, [(1000, -20.5), (4000, 8)])
    heard = heard + np.array([sway, -sway])

    def out_of_step(hz):
        half_turn = np.exp(1j * along(LEFT_LEAD, hz) / 2)
        return np.array([half_turn, np.conj(half_turn)])
    return filtered(heard, out_of_step) + background()


def smooth(v, s):
    """Let a value follow its target with a lag of s seconds."""
    keep = np.exp(-1 / (s * SR))
    return signal.lfilter([1 - keep], [1, -keep], v)


def gain_control(x, threshold_db, recovery_db):
    """The gain drops within milliseconds of a loud sound and recovers by recovery_db each second."""
    level_db = 10 * np.log10(smooth(np.mean(x ** 2, 0), 0.0034) + 1e-12)
    over = np.maximum(level_db - threshold_db, 0)
    creep = recovery_db * np.arange(N) / SR
    cut_db = np.maximum.accumulate(over + creep) - creep
    return x * amp(-smooth(cut_db, 0.0039))


TOP_HZ = 15800  # nothing is passed from here up


def record(dry):
    """Gain control, clipping at full scale and a limit on the treble."""
    held = np.clip(gain_control(dry, threshold_db=-8.0, recovery_db=5.5), -1, 1)
    return filtered(held, lambda hz: hz < TOP_HZ)


dry = scene()
out = record(dry)
store_pcm(out)
```